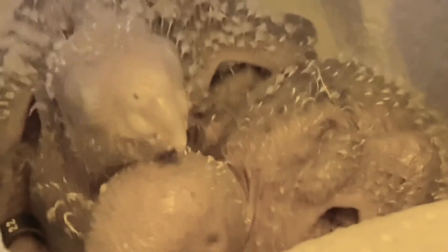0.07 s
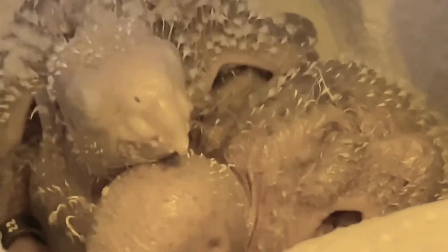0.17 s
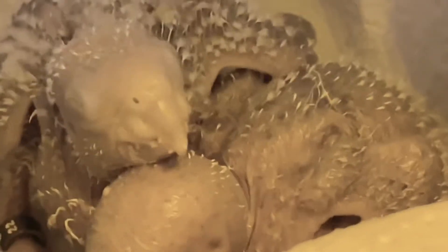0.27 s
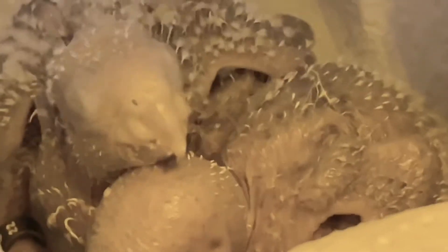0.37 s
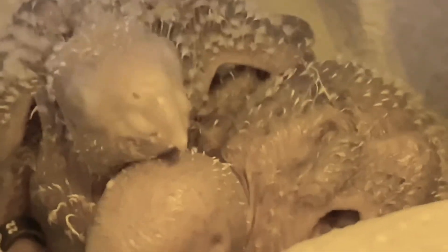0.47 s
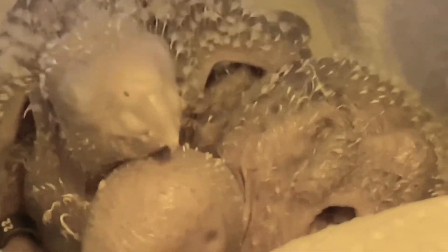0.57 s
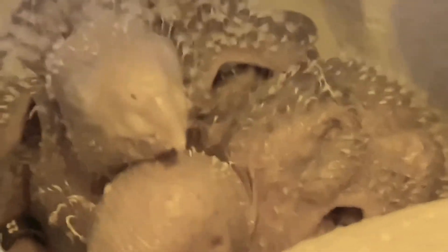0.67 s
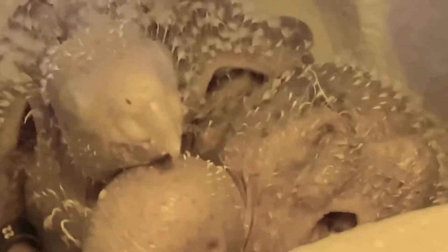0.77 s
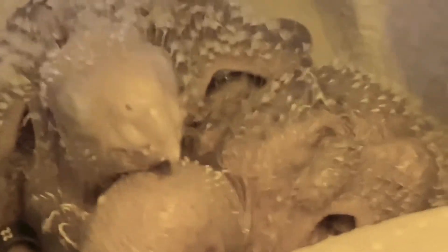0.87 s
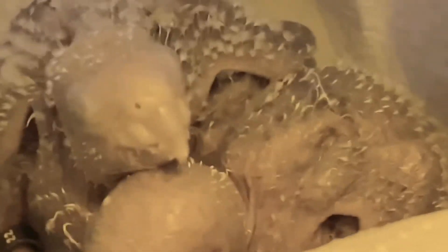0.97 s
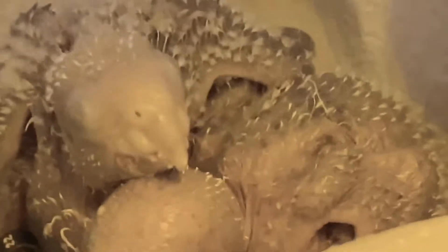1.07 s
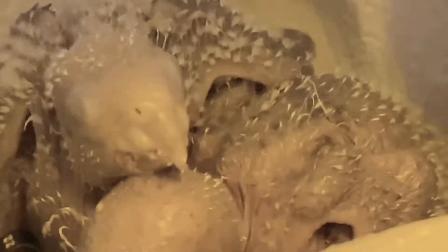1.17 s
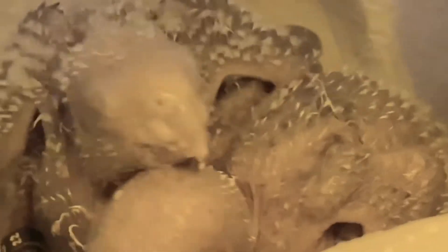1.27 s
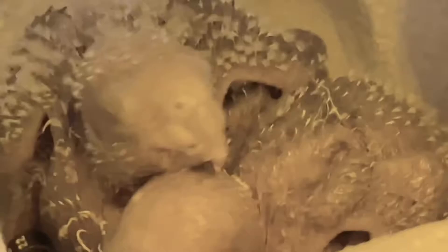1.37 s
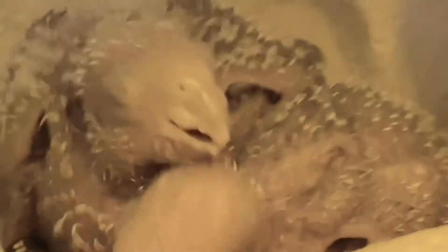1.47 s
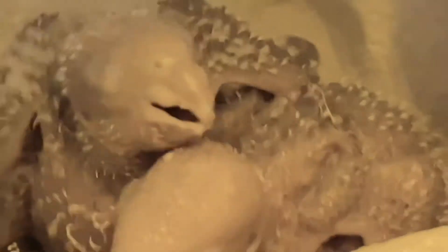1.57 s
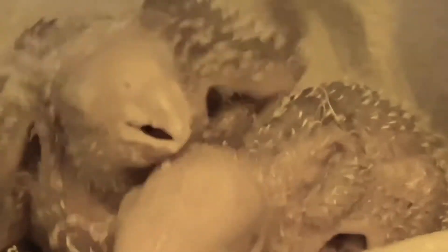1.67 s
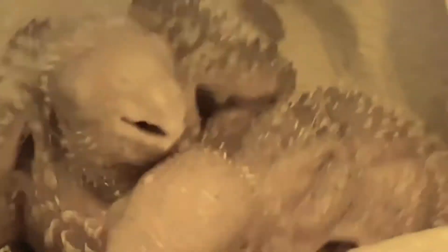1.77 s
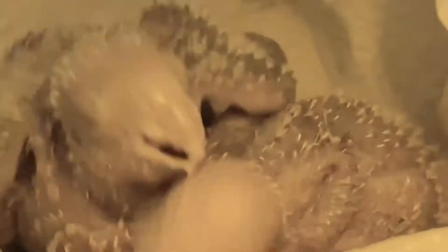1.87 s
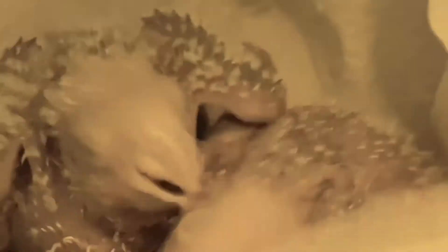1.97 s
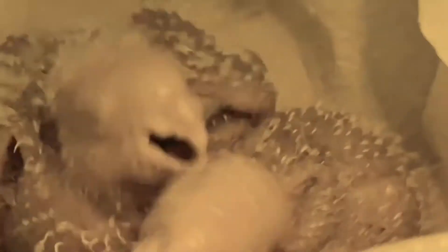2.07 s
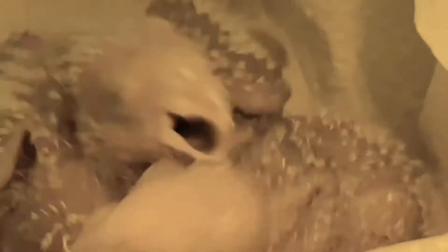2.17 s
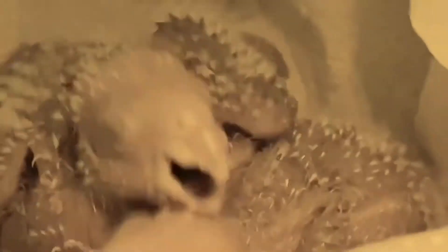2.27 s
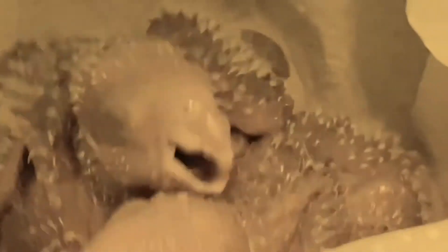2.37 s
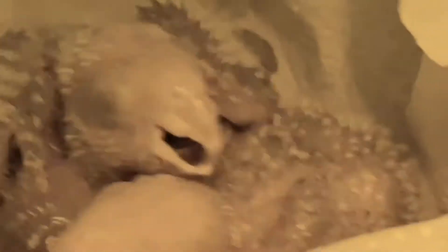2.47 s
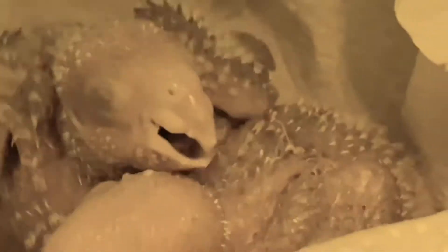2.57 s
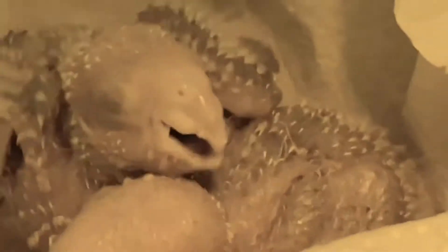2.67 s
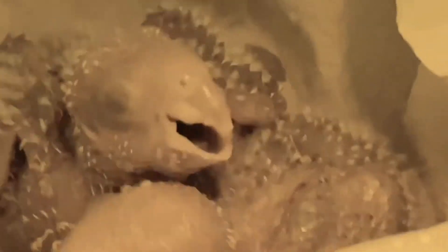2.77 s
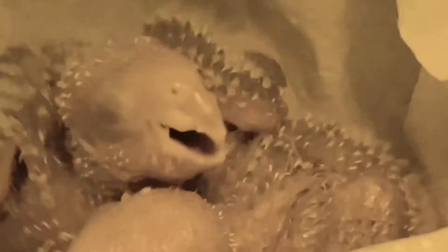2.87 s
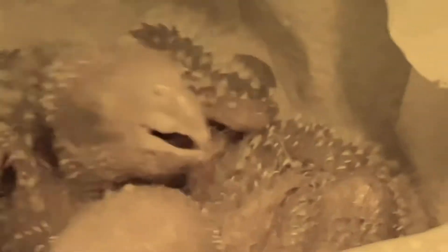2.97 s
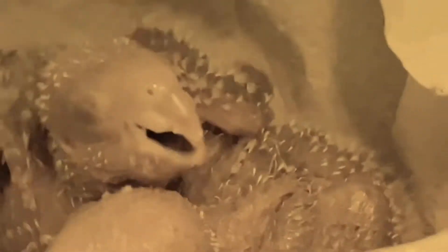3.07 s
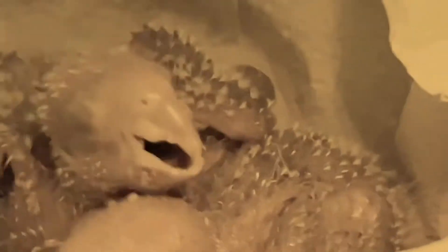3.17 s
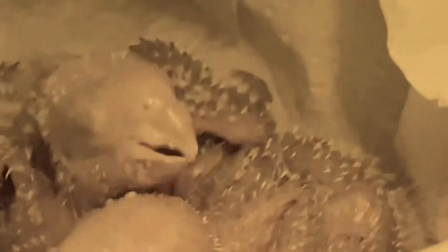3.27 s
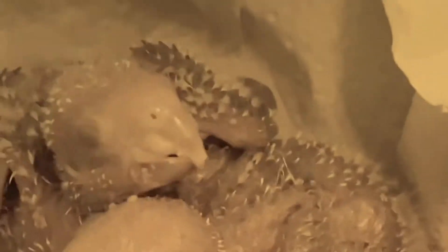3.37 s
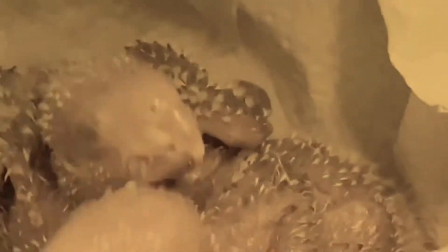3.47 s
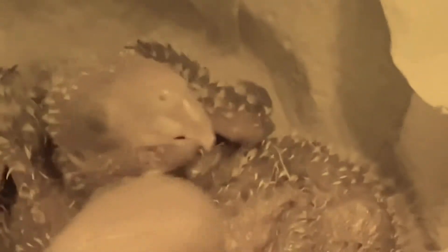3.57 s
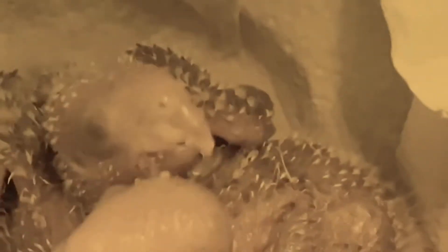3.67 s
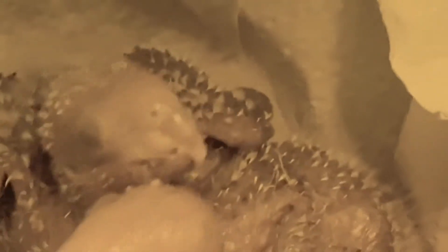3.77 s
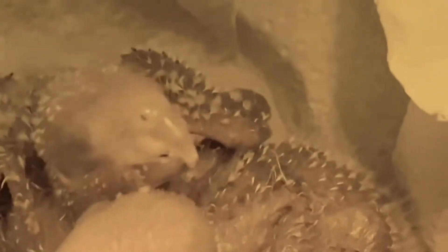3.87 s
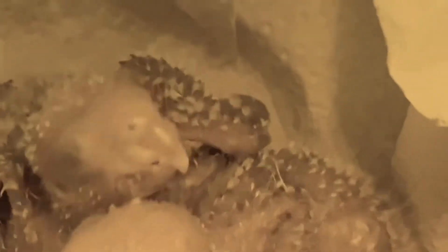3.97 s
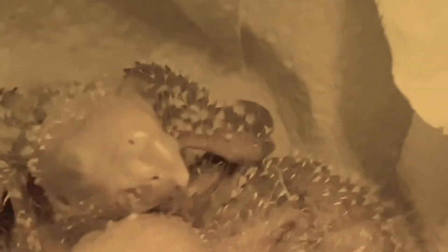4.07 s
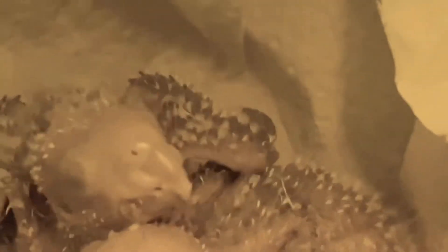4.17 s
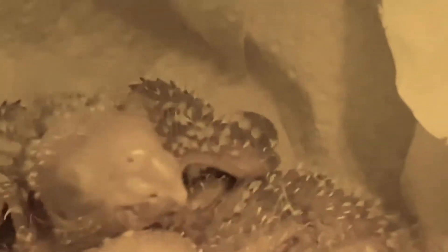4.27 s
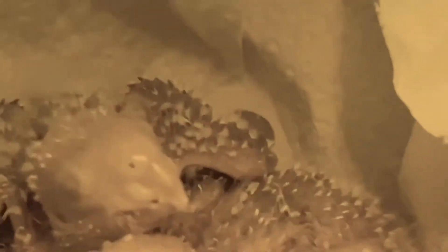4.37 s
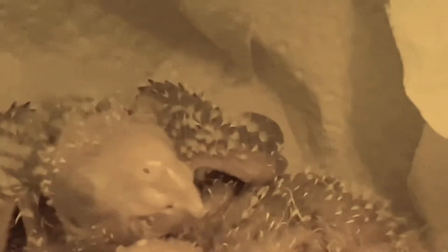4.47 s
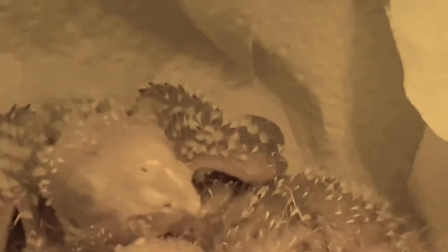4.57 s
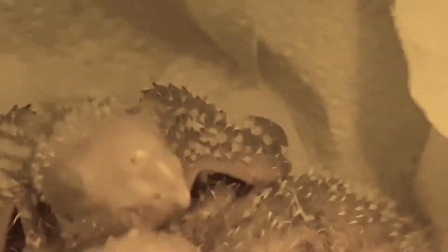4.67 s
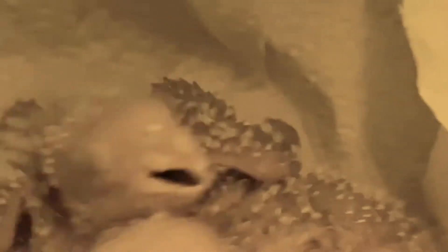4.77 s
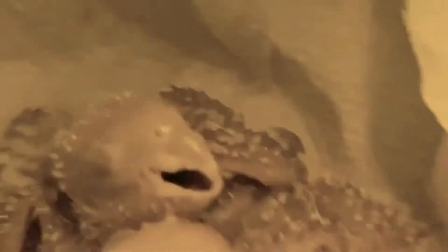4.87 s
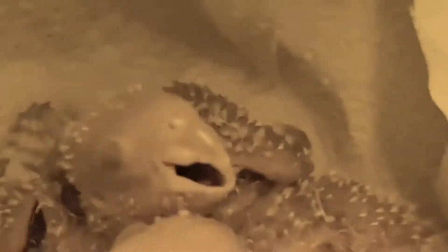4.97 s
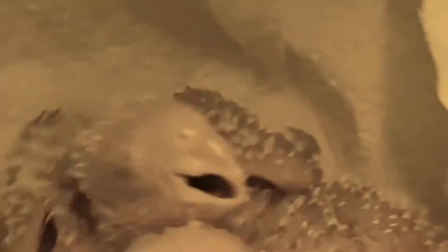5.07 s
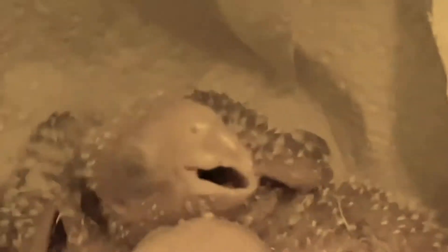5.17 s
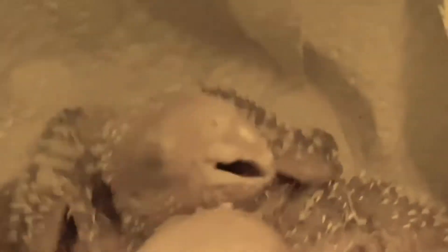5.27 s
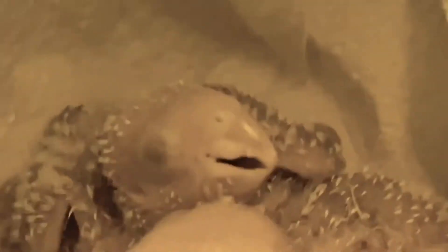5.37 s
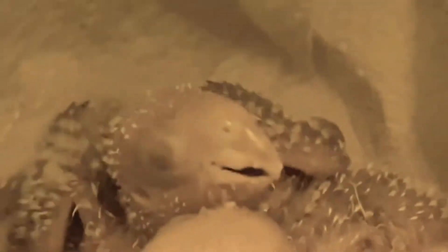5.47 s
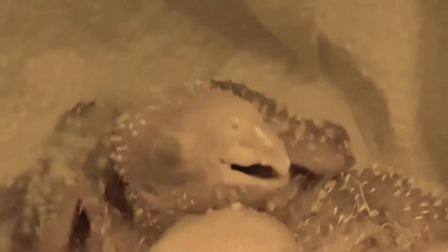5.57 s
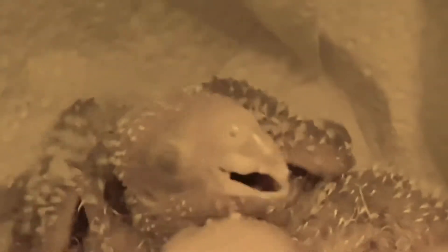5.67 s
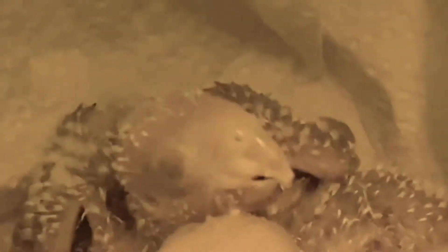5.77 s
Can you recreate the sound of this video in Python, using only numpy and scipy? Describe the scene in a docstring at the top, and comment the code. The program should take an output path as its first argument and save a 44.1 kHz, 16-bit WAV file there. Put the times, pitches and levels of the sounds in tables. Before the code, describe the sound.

A parrot chick close by begs in two rapid bursts of raspy, piercing chirps, with soft peeps between, over a faint low fan hum.

```python
"""Parrot chicks beg close to the microphone in a small heated box. Most chirps of the near chick open with a rasp;
each has an arched whistle (a near-sine with its octave) and falls off in a hiss of filtered noise.
Soft harmonic peeps sound on the in-breath, and a second chick whistles thinly from further back.
Behind them a fan hums, feathers rustle and claws tick on paper (all shaped noise), and bodies thud on the wall.
The walls answer briefly, and two microphone ports shift the phase of the treble in opposite directions."""
import sys
import numpy as np
from scipy import signal
from scipy.fft import rfft, irfft, next_fast_len
from scipy.io import wavfile
from scipy.ndimage import uniform_filter1d, map_coordinates

SR = 44100
rng = np.random.default_rng(int(sys.argv[2]) if len(sys.argv) > 2 else 0)


def convert_level_to_amplitude(level_db):
    """Map a level in decibels to its linear amplitude factor."""
    exponent = np.asarray(level_db, float) / 20
    return 10 ** exponent


def file_out(sig):
    """Save sig as 16-bit WAV at sys.argv[1]."""
    # one column per channel
    cols = np.atleast_2d(sig).T
    # limit, then scale
    lim = np.clip(cols, -1, 1)
    pcm = np.round(lim * 32767).astype(np.int16)
    wavfile.write(sys.argv[1], SR, pcm)


N = 257103  # samples

# Near chick, the breath of each chirp. Each row: start in seconds, reference level of the opening rasp in dB,
# reference level of the closing hiss in dB.
CHIRP_BREATHS = [(1.402, -54, -38.5), (1.496, -33, -37), (1.592, -32, -37), (1.689, -29, -33.5),
                 (1.789, -26.5, -35), (1.892, -28.5, -36), (1.995, -28, -29.5), (2.106, -25, -38.5),
                 (2.233, -27.5, -52), (2.349, -34.5, -44), (2.47, -33, -41), (2.586, -31.5, -35),
                 (2.713, -32, -31.5), (2.841, -31.5, -39), (2.982, -30.5, -32), (3.112, -31, -32.5),
                 (4.716, -37.5, -26), (4.823, -31, -74), (4.924, -31.5, -40.5), (5.027, -29.5, -39),
                 (5.137, -31.5, -44), (5.25, -31.5, -58), (5.366, -31, -39.5), (5.487, -31.5, -38),
                 (5.613, -31, -34)]
# Near chick, the whistle of each chirp, row for row with the breaths. Each row: time of locking in in seconds,
# length in seconds, top pitch in Hz, level at both ends in dB before box colour, swell in the middle in dB.
CHIRP_WHISTLES = [(1.416, 0.032, 5330, -22.5, -11), (1.509, 0.036, 5436, -20.5, -0.5),
                  (1.6083, 0.034, 5410, -20, -1.8), (1.7056, 0.034, 5326, -14.5, -5.5),
                  (1.804, 0.034, 5396, -15, -5.5), (1.9109, 0.034, 5324, -13, -10.5),
                  (2.0131, 0.035, 5453, -16.5, -1.6), (2.1241, 0.035, 5573, -15, -4.5),
                  (2.2518, 0.037, 5780, -30, 17.5), (2.369, 0.034, 5677, -28, 7.5),
                  (2.488, 0.035, 5754, -23.5, 0), (2.6038, 0.042, 5684, -22.5, -1),
                  (2.7334, 0.036, 5590, -23.5, 3.5), (2.864, 0.036, 5640, -22, 0.2),
                  (3.0093, 0.037, 5606, -22.5, 5.5), (3.1414, 0.035, 5530, -20, 1),
                  (4.728, 0.0581, 5546, -25, 4.5), (4.8389, 0.037, 5780, -21, 4.5),
                  (4.9392, 0.037, 5683, -21, 2.2), (5.0408, 0.037, 5570, -22, 1),
                  (5.1534, 0.038, 5517, -21, -0.5), (5.2731, 0.029, 5426, -23, 4.5),
                  (5.3865, 0.032, 5385, -23.5, 4.5), (5.5097, 0.034, 5267, -19.5, -3.7),
                  (5.64, 0.028, 5244, -21.5, -0.2)]
# Near chick, in-breath peeps. Each row: start in seconds, length in seconds, first pitch in Hz,
# reference level in dB.
INBREATH_PEEPS = [(1.765, 0.012, 1000, -50), (1.87, 0.017, 990, -48), (2.077, 0.027, 1080, -32.5),
                  (2.187, 0.051, 1002, -38.5), (2.321, 0.019, 1023, -43.5), (2.431, 0.036, 1033, -42.5),
                  (2.553, 0.029, 1050, -43), (2.672, 0.042, 1054, -40), (2.798, 0.039, 1060, -38),
                  (2.928, 0.05, 1060, -38), (3.073, 0.031, 1013, -42), (3.202, 0.066, 1079, -33.5),
                  (4.996, 0.0116, 980, -71), (5.106, 0.018, 987, -43.5), (5.219, 0.04, 970, -45),
                  (5.335, 0.028, 1000, -46), (5.451, 0.024, 1010, -43), (5.573, 0.022, 995, -41.5),
                  (5.7, 0.032, 1048, -38.5)]
# Second chick, held whistles. Each row: start of the hold in seconds, length in seconds, first pitch in Hz,
# last pitch in Hz, level halfway in dB before box colour.
FAR_WHISTLES = [(2.525, .065, 5100, 5600, -40.5), (2.645, .075, 5290, 5240, -35.5),
                (2.77, .027, 5370, 5080, -34.5), (5.195, .065, 5090, 5220, -38),
                (5.305, .07, 5173, 5386, -37), (5.545, .045, 5290, 5500, -36),
                (5.592, .02, 5550, 5100, -33)]
# Colour of throat and open beak in rasp and breath. Each row: frequency in Hz, relative level in dB.
THROAT_COLOUR = [(700, -25.5), (1200, -11), (1550, -24), (2100, -20), (2800, -7), (3350, -10.5), (4280, 5),
                 (4900, -3.5), (7200, -1), (9800, -10.5), (11200, -7), (12600, -21), (13600, -50),
                 (15400, -54)]
# Colour of the in-breath peeps. Each row: frequency in Hz, relative level in dB.
INBREATH_COLOUR = [(1100, -6.5), (2250, -12.5), (4400, 4), (5500, -6), (7800, -8), (11400, -27.5),
                   (13000, -31.5)]
# What box and microphone do to a pure tone. Each row: frequency in Hz, gain in dB.
BOX_COLOUR = [(2000, -14), (4300, -6.5), (4950, -5), (5100, 3), (5430, -1.5), (5700, 3), (6200, -3),
              (9800, -16), (11050, 5), (11400, -1), (12500, -18.5)]
# Spectrum of the fan. Each row: frequency in Hz, relative density in dB per Hz.
FAN_SPECTRUM = [(25, -25), (55, -12), (95, -8.5), (114, 1), (140, -14.5), (313, -20.5), (466, -17.5),
                (969, -33.5), (2410, -45), (6000, -67.5)]
# The fan swells, dips and settles. Each row: time in seconds, level in dB before a small random sway.
FAN_LEVEL = [(1.2, -48), (2.1, -43), (2.35, -52), (3.2, -48.5), (5.83, -48)]
# Spectrum of feathers on paper. Each row: frequency in Hz, relative density in dB per Hz.
RUSTLE_SPECTRUM = [(1200, -24.5), (2500, -8.5), (4000, -15), (9000, -13.5), (11500, -11), (12700, -47.5)]
# Course of the rustle. Each row: time in seconds, level in dB before its random waves.
RUSTLE_COURSE = [(1.3, -100), (1.5, -77.5), (3.3, -76), (3.9, -72.5), (4.02, -74), (4.1, -69), (4.65, -70),
                 (4.75, -82.5), (5.7, -61.5), (5.83, -61.5)]
# Claws on paper. Each row: start in seconds, drive in dB before the attack and decay.
CLAW_TICKS = [(3.8427, -59), (3.9071, -57.5), (3.9454, -56.5), (4.6412, -58)]
# Bodies against the wall. Each row: start in seconds, level in dB before attack and decay, settling pitch in Hz.
WALL_BUMPS = [(.83, -38.5, 55), (1.187, -31.5, 62), (1.48, -32.5, 55.54), (1.612, -34, 85),
              (1.632, -33, 52), (2.007, -24.5, 121), (2.047, -32, 62), (2.136, -31.5, 61.9),
              (2.168, -36, 64.7), (5.33, -31, 59.2)]
# Left-right likeness of the fan before the ports' phase shift. Each row: frequency in Hz, correlation (1 = alike).
FAN_LIKENESS = [(60, 0.94), (270, 0.064), (700, 0.77), (3000, 0.92)]
# Phase between the microphone ports. Each row: frequency in Hz, lead of the left in radians.
PORT_PHASE = [(1000, 0.5), (5500, .5), (8700, 0), (9900, -2.5), (10800, -4.5), (11600, -5.5), (12600, -4.5),
              (14900, -10.5)]

SLIDE_S, RUN_UP_DB = 0.0077, 10  # a whistle's run-up to its pitch; how much fainter it is where that begins
SLIDE_DEPTH, GLIDE_DEPTH = 0.065, 0.47  # share of the pitch climbed in the run-up, after and without a rasp
FAINT_DB = -40  # a chirp pushed no harder than this has no rasp
LOCK_HZ, FLAT_PER_S = 4990, 65  # ends of the near chick's arch; the longer it is held, the flatter its top
LATE_TOP = 0.046  # share of its length by which the top comes after the middle
FLUTTER_DB = 1.5  # unsteadiness of the near whistle's level
LANDING_HZ, LANDING_S, LANDING_DB = 1150, 0.008, -14  # slack note: first pitch, delay, peak over hiss reference
ECHO_S, ECHO_DB = 0.0045, -11  # latest close reflection; level of each against the direct sound
STRAIN_HZ, EASY_HZ = 200, 60  # second chick's pitch shake while it pushes up, and while it lets the note sink
EFFORT_DB_PER_KHZ = 4  # the second chick grows louder as it pushes the pitch up


def unit(x):
    """Scaled to rms 1."""
    return x / np.sqrt(np.mean(x ** 2) + 1e-20)


def along(points, hz):
    """Reads (Hz, value) points on a log frequency axis."""
    f, v = np.transpose(points)
    return np.interp(np.log(hz + 1), np.log(f + 1), v)


def curve(rows):
    """One value per sample from (seconds, value) rows."""
    return np.interp(np.arange(N) / SR, *np.transpose(rows))


def wobble(rate, size=N):
    """A smooth random curve with rate knots a second."""
    knots = rng.standard_normal(int(size * rate / SR) + 4)
    return map_coordinates(knots, [np.arange(size) * rate / SR])


def filtered(x, response):
    """Multiplies the spectrum of x by a complex response of frequency."""
    m = next_fast_len(N + SR // 2)
    return irfft(rfft(x, m) * response(np.fft.rfftfreq(m, 1 / SR)), m)[..., :N]


def coloured_noise(colour):
    """White noise shaped by (Hz, dB) points, at rms 1."""
    return unit(filtered(rng.standard_normal(N), lambda hz: convert_level_to_amplitude(along(colour, hz))))


def add(track, s, x):
    """Mixes x into the track from second s."""
    track[round(s * SR):][:len(x)] += x


def times(length):
    """Sample times of a stretch, in seconds."""
    return np.arange(round(length * SR)) / SR


def fan():
    """Low hum and rush: shared mid and side noise make the two ports partly alike, by frequency."""
    def mid_side_gains(hz):
        turn = np.arccos(np.clip(along(FAN_LIKENESS, hz), -1, 1)) / 2
        return convert_level_to_amplitude(along(FAN_SPECTRUM, hz)) * [np.cos(turn), np.sin(turn)]

    mid, side = filtered(rng.standard_normal((2, N)), mid_side_gains)
    level = convert_level_to_amplitude(curve(FAN_LEVEL) + 1.1 * wobble(10))
    return level * unit(np.array([mid + side, mid - side]))


def bumps():
    """Soft low thuds of bodies on the wall: decaying sines that drop quickly to their settling pitch."""
    track, t = np.zeros(N), times(0.1)
    for s, db, hz in WALL_BUMPS:
        turn = 2 * np.pi * hz * (t + 0.0066 * (1 - np.exp(-t / 0.006)))
        envelope = convert_level_to_amplitude(db - 60 * t / 0.076) * (1 - np.exp(-t / 0.0026))
        add(track, s, envelope * np.sin(turn))
    return track


def rustle():
    """Friction noise on paper: feathers brush in uneven waves, claws tick in short bursts."""
    waves_db = 1.8 * wobble(8) + 2.2 * wobble(22) + 1.8 * wobble(99)
    drive = convert_level_to_amplitude(curve(RUSTLE_COURSE) + waves_db)
    t = times(0.01097)
    for s, db in CLAW_TICKS:
        add(drive, s, convert_level_to_amplitude(db - 60 * t / 0.038) * (1 - np.exp(-t / 0.001113)))
    return drive * coloured_noise(RUSTLE_SPECTRUM)


def box(x):
    """Short answer of the walls: decaying noise that lingers a little around the whistle's pitch."""
    hz, t, z = signal.stft(rng.standard_normal((2, SR // 5)), SR, nperseg=128)
    t60 = along([(1000, 0.055), (4900, 0.037), (5300, 0.078), (5700, 0.042)], hz)  # seconds to fall 60 dB
    tail = signal.istft(z * convert_level_to_amplitude(-60 * t / t60[:, None]), SR, nperseg=128)[1]
    left_right = tail[0] + 0.49 * tail[1] * np.array([[1], [-1]])
    return signal.fftconvolve(x[None], left_right / np.linalg.norm(tail[0]), axes=1)[:, :N]


def near_walls(x):
    """Close copies from nest and walls; the head has moved, so every call gets new paths and new dropouts."""
    paths = np.zeros(round(ECHO_S * SR) + 1)
    paths[0] = 1
    delay, sign = rng.random((2, 4))
    places = np.round((0.2 + 0.8 * delay) * ECHO_S * SR).astype(int)
    paths[places] = convert_level_to_amplitude(ECHO_DB) * np.sign(sign - 0.5)
    heard = np.convolve(x, paths)
    return heard * np.linalg.norm(x) / np.linalg.norm(heard)


def stack(hz, colour, flutter_db, count):
    """Harmonics of a pitch curve, each weighted by the colour at its own frequency and fluttering on its own."""
    k = np.arange(1, count + 1)[:, None]
    flutter = flutter_db * np.array([wobble(230, size=len(hz)) for _ in k])
    turn = 2 * np.pi * (k * np.cumsum(hz) / SR + rng.random(k.shape))
    return np.sqrt(2) * np.sum(convert_level_to_amplitude(along(colour, k * hz) + flutter) * np.cos(turn), axis=0)


def whistle(rows, shake_hz, flutter_db, overtone_db, fall, slide=SLIDE_S, depth=SLIDE_DEPTH):
    """A near-sine with its octave; it slides up into place, and as the breath fails it plunges, shakes and fades."""
    s, hz, db = np.transpose(rows)
    t = s[0] - slide + times(slide + s[-1] - s[0] + fall)
    early = np.clip((s[0] - t) / slide, 0, 1)  # 1 to 0 over the run-up
    late = np.clip((t - s[-1]) / fall, 0, 1)  # 0 to 1 over the fall
    bend = 1 - 0.66 * (1 - np.exp(-2.6 * late)) - depth * early ** 1.6
    shake = (shake_hz + 350 * late) * wobble(450, size=len(t))
    pitch = uniform_filter1d(np.interp(t, s, hz) * bend, size=120) + shake
    level_db = flutter_db * wobble(210, size=len(t)) - 19 * late ** 0.5 - RUN_UP_DB * early
    turn = 2 * np.pi * np.cumsum(pitch) / SR
    tone = convert_level_to_amplitude(np.interp(t, s, db) + along(BOX_COLOUR, pitch)) * np.sin(turn)
    octave_colour_db = uniform_filter1d(along(BOX_COLOUR, 2 * pitch), size=80)
    octave = convert_level_to_amplitude(db.mean() + overtone_db + octave_colour_db - 49 * late) * np.sin(2 * turn)
    return np.sqrt(2) * convert_level_to_amplitude(level_db) * np.sqrt(1 - early) * (1 - late) * (tone + octave)


def second_chick():
    """A thin whistle from further back, with breath noise that follows its level."""
    track, air = np.zeros((2, N))
    for s, length, first_hz, last_hz, db in FAR_WHISTLES:
        push_db = EFFORT_DB_PER_KHZ * (last_hz - first_hz) / 2000  # half the rise, either side of the middle
        rows = [(s, first_hz, db - push_db), (s + length, last_hz, db + push_db)]
        shake_hz = STRAIN_HZ if last_hz > first_hz else EASY_HZ
        call = whistle(rows, shake_hz, flutter_db=1.0, overtone_db=-10.5, fall=0.0027)
        add(track, s - SLIDE_S, call)
        add(air, s - SLIDE_S, uniform_filter1d(np.abs(call), size=200))
    return track + convert_level_to_amplitude(-16.5) * air * coloured_noise(THROAT_COLOUR)


def peeps():
    """Soft in-breath harmonics that hold, then sink in pitch and level, the upper partials first."""
    track = np.zeros(N)
    for s, length, hz, db in INBREATH_PEEPS:
        u = times(length) / length
        bend = 1 + 4 * length * u * (1 - u) - 0.23 * u ** 1.7
        pitch = hz * bend + 12 * wobble(300, size=len(u))
        sink = np.clip((u - 0.33) / 0.45, 0, 1.5)
        note = stack(pitch, INBREATH_COLOUR, flutter_db=2.5, count=11)
        dull = uniform_filter1d(note, size=9)
        body = convert_level_to_amplitude(-6 - 24 * sink) * note + convert_level_to_amplitude(-13 - 6 * sink) * dull
        edge = np.clip(u / 0.067, 0, 1) * np.clip((1 - u) / 0.1, 0, 1)
        add(track, s, near_walls(convert_level_to_amplitude(db) * edge * body))
    return track


def arch(s, length, top_hz, db, swell_db):
    """(seconds, Hz, dB) rows of a whistle that bows up from the locking pitch and back."""
    away = np.linspace(-1, 1, num=25)  # 0 at the top
    bow = 1 - away ** 2
    when = s + length * ((away + 1) / 2 + LATE_TOP * bow)
    pitch = top_hz - (top_hz - LOCK_HZ) * np.abs(away) ** (FLAT_PER_S * length)
    return np.transpose([when, pitch, db + swell_db * bow])


def rasp(lock, rasp_db):
    """The membranes start near 1.1 kHz, tighten, and turn chaotic before the whistle locks in."""
    t = times(lock + 0.0025)
    edge = np.clip(t / 0.0033, 0, 1) * np.clip((t[-1] - t) / 0.0041, 0, 1)
    shape = convert_level_to_amplitude(-2.5 * np.exp(-t / 0.012)) * edge
    chaos = (t / t[-1]) ** 2.5
    pitch = 1080 + 16000 * t + 350 * chaos + (15 + 170 * chaos) * wobble(900, size=len(t))
    voice = convert_level_to_amplitude(rasp_db + 7) * shape * unit(stack(pitch, THROAT_COLOUR, flutter_db=3.5, count=10))
    air = convert_level_to_amplitude(rasp_db + 1) * shape * (0.3 + chaos)
    puff = convert_level_to_amplitude(rasp_db - 6 - 60 * t / 0.02) * shape  # the beak pops open
    return voice, air, puff


def landing_note(hiss_db):
    """A short slack note, sinking in pitch, under the closing hiss."""
    t = times(0.011)
    return convert_level_to_amplitude(hiss_db + LANDING_DB) * np.hanning(len(t)) * np.sin(2 * np.pi * LANDING_HZ * t * (1 - 8 * t))


def escaping_air(end, rasp_db, hiss_db):
    """Drive of the breath noise: air leaks past the whistle and bursts out as it ends."""
    t = times(end + 0.044)
    leak = convert_level_to_amplitude(rasp_db + 1 - 420 * t) * (t < end) * np.clip(t / 0.0016, 0, 1)
    decay = convert_level_to_amplitude(hiss_db - 60 * np.clip(t - end - 0.004, 0, 1) / 0.028)
    return leak + decay * np.clip((t - end + 0.0045) / 0.0022, 0, 1)


def chirps():
    """The near chick: voiced rasp, whistle and slack note, with turbulent breath coloured by the throat."""
    tones, air, puffs = np.zeros((3, N))
    for (s, rasp_db, hiss_db), call in zip(CHIRP_BREATHS, CHIRP_WHISTLES):
        rows = arch(*call)
        lock, end = rows[0][0] - s, rows[-1][0] - s
        slide, depth = lock, GLIDE_DEPTH  # without a rasp the whistle glides up from the start
        if rasp_db > FAINT_DB:
            slide, depth = SLIDE_S, SLIDE_DEPTH
            for track, part in zip((tones, air, puffs), rasp(lock, rasp_db)):
                add(track, s, part)
        note = whistle(rows, shake_hz=25.6, flutter_db=FLUTTER_DB, overtone_db=-4, fall=0.015,
                       slide=slide, depth=depth)
        add(tones, rows[0][0] - slide, near_walls(note))
        add(tones, s + end + LANDING_S, landing_note(hiss_db))
        add(air, s, escaping_air(end, rasp_db, hiss_db))
    grain = convert_level_to_amplitude(3 * wobble(350))  # the turbulence comes in uneven clumps
    breath = air * coloured_noise(THROAT_COLOUR) * grain
    # differencing twice makes the puffs bright
    bright_puffs = np.gradient(np.diff(puffs * rng.standard_normal(N), prepend=0))
    return tones + breath + bright_puffs


def scene():
    """All sources in the box; only the birds' voices excite the wall answer."""
    birds = chirps() + peeps() + second_chick()
    return birds + convert_level_to_amplitude(-12.5) * box(birds) + rustle() + bumps() + fan()


def low_pass(x):
    """Removes everything above the highest recorded frequency."""
    return signal.sosfilt(signal.butter(12, 16960, fs=SR, output="sos"), x)


def record(dry):
    """Two microphone ports turn the phase in opposite directions, half of the difference each."""
    sides = np.array([[1], [-1]])
    ports = filtered(dry, lambda hz: np.exp(0.5j * along(PORT_PHASE, hz) * sides))
    return low_pass(ports)


dry = scene()
out = record(dry)
file_out(out)
```